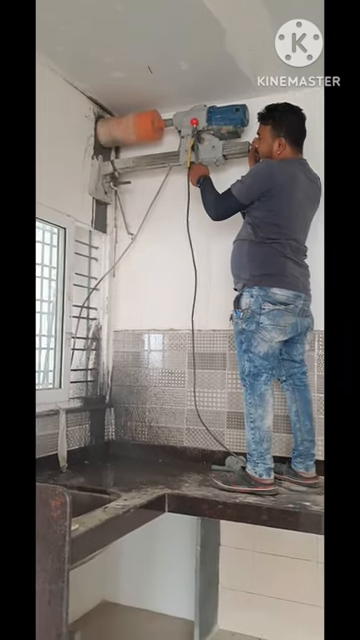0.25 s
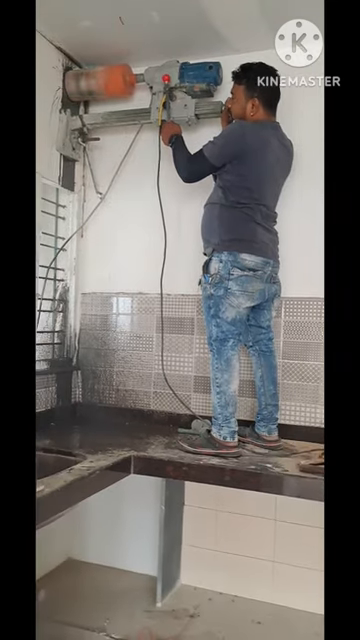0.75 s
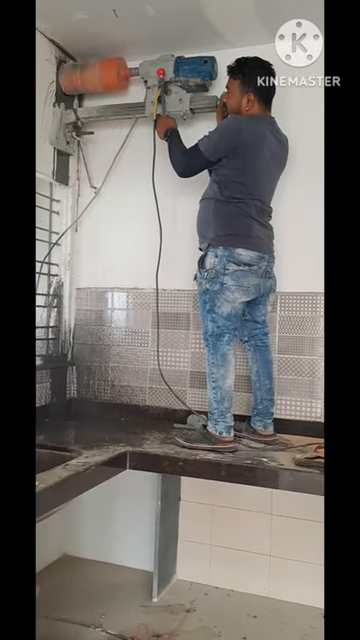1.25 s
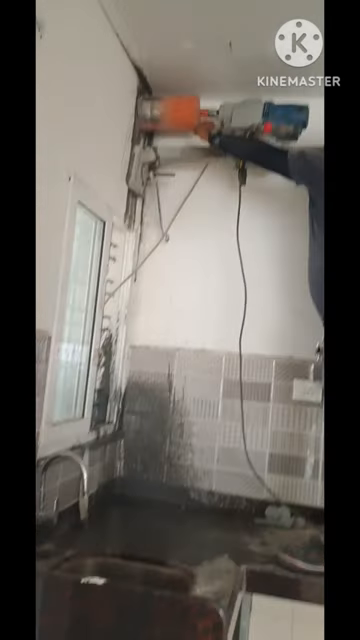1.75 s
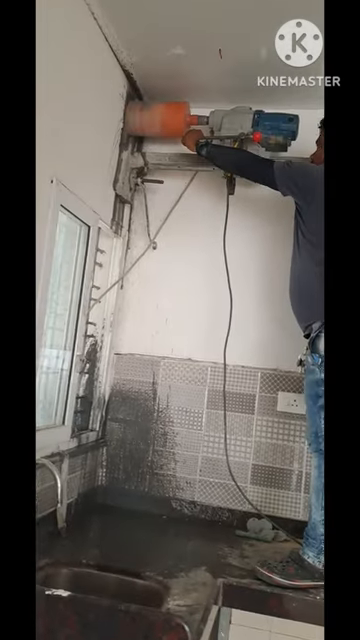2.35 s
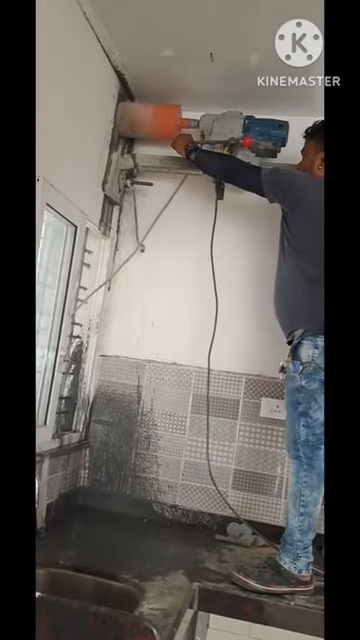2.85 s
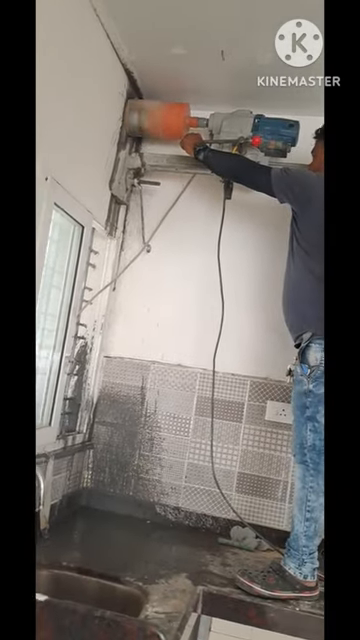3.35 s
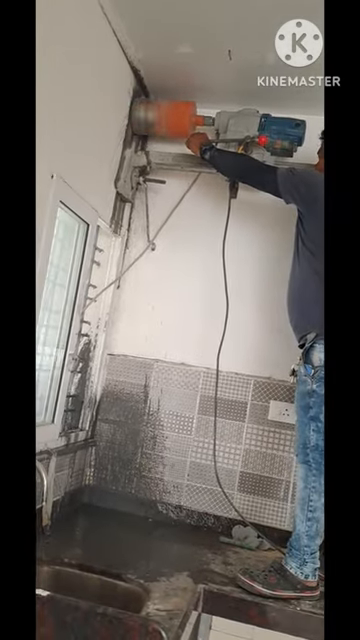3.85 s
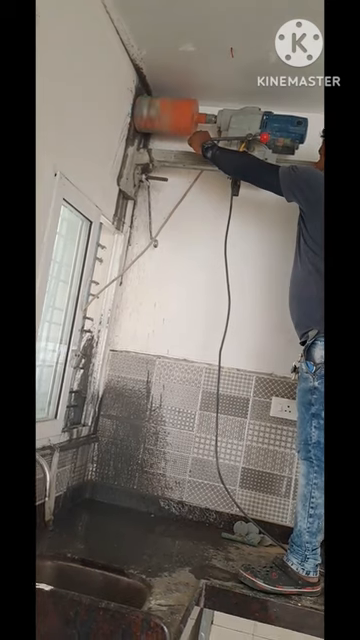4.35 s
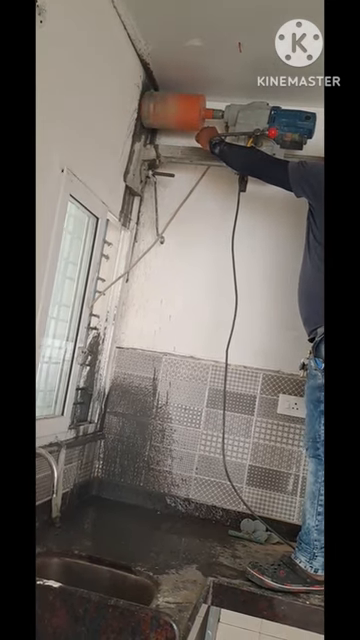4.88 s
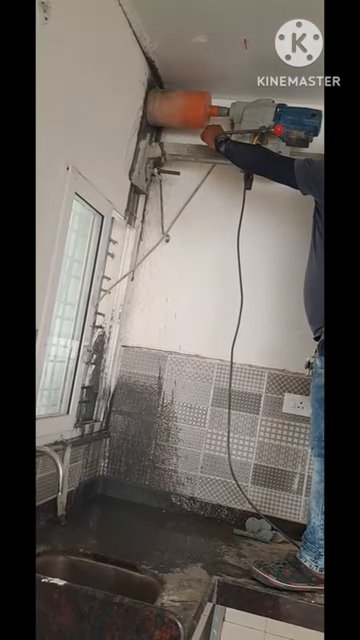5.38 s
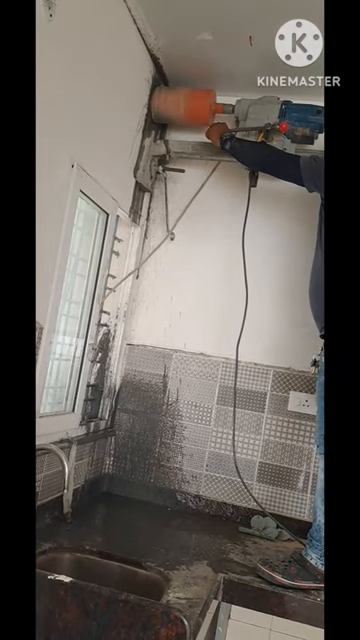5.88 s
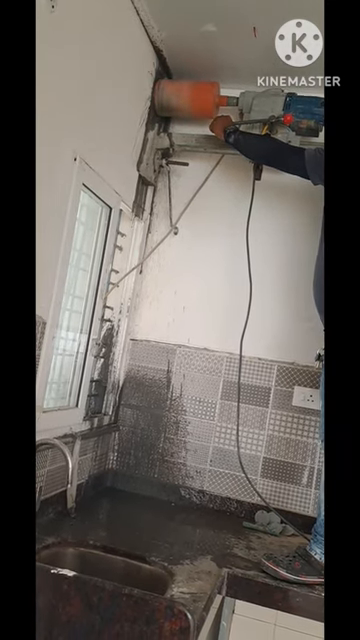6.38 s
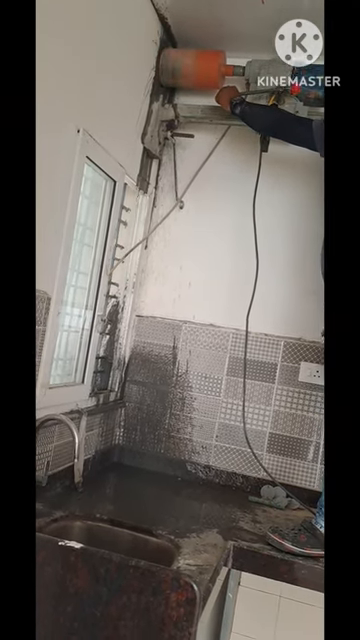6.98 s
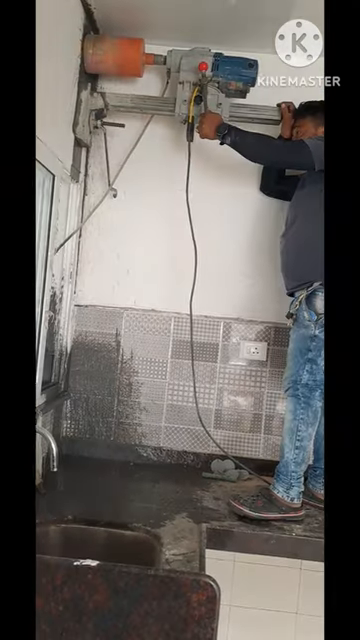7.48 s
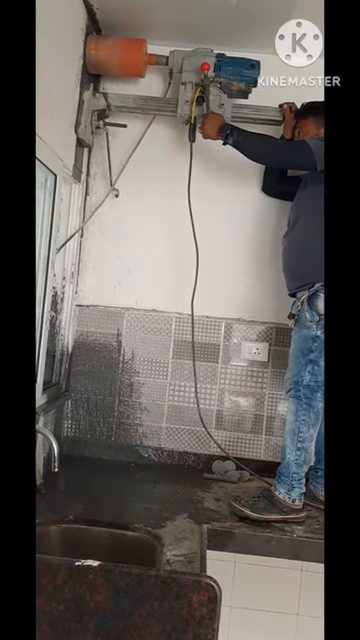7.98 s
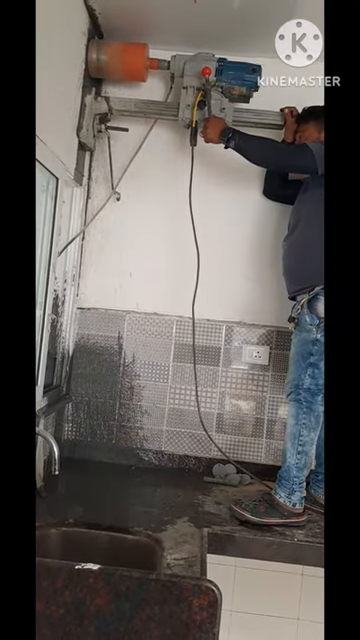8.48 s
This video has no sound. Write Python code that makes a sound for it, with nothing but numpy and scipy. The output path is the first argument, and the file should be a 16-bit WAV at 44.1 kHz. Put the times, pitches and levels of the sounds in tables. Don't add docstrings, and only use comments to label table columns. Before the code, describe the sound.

An electric core drill grinds steadily into a concrete wall in a hard, bare kitchen, its whining motor dipping briefly at two camera changes.

```python
import sys
import numpy as np
from scipy import signal
from scipy.fft import rfft, irfft, next_fast_len
from scipy.io import wavfile
from scipy.ndimage import uniform_filter1d, map_coordinates

SR = 44100
rng = np.random.default_rng(int(sys.argv[2]) if len(sys.argv) > 2 else 0)


def file_out(sig):
    cols = np.atleast_2d(sig).T
    lim = np.clip(cols, -1, 1)
    pcm = np.round(lim * 32767).astype(np.int16)
    wavfile.write(sys.argv[1], SR, pcm)


def how_loud(loudness_db):
    steps = np.asarray(loudness_db, float) / 20
    return 10 ** steps


N = 384993

# t/s, speed/(turns/s)
ROTOR_SPEED = [
    [(0, 352.2), (.8, 349.6), (1.5, 346.4)],
    [(1.54, 371), (1.9, 374.6), (2.03, 374.4), (2.34, 359.3), (2.74, 349.6), (3.14, 342.7), (3.44, 340.1),
     (4.0, 337.4), (5.04, 340), (5.74, 338.6), (6.2, 336.9), (7.34, 338.2)],
    [(7.6, 319), (8, 316), (8.73, 315)],
]
LOADED_HZ = 338


def motor(place, t):
    orders = [
        (1, 0, 0, .8, 0),
        (2, 0, -16, 3, .3),
        (4, 3, -11, 2, .5),
        (12, 1, -.7, -7, .5),
        (24, 2, -7, 4, 1.5),
        (16, 2, -.6, -4, -.5),
        (8, 3, .3, -3, -.5),
    ]
    speed_hz, = curves(ROTOR_SPEED[place], t)
    levels_db = whines(place, t, speed_hz)
    turns_rad = 2 * np.pi * np.cumsum(speed_hz + 0.095 * wobble(t, 25)) / SR
    sides = np.array([[.5], [-.5]])
    out = np.zeros((2, len(t)))
    for multiple, column, over_db, lean_db, lead_rad in orders:
        high = multiple > 1.5
        port_flutter_db = 0.7 * high * np.array([wobble(t, 9), wobble(t, 9)])
        flutter_db = 1.85 * wobble(t, 26) + port_flutter_db
        side_db = sides * (lean_db + (.9 + 1.2 * high) * wobble(t, 2))
        level_db = levels_db[column] + over_db + 3 + side_db
        side_rad = sides * (lead_rad + 0.69 * high * wobble(t, 2.46))
        out += how_loud(level_db + flutter_db) * np.sin(multiple * turns_rad + side_rad)
    return out, turns_rad


def whines(place, t, speed_hz):
    # unbalance hum/dB, slot whine/dB, fan whine/dB, pinion whine/dB
    usual_db = [(-31.5, -32, -34, -41), (-31.5, -28.5, -34, -36), (-33, -33.5, -42, -40)]
    # middle/s, length/s, level/dB
    crest_rows = [
        [(.04, .2, -9), (1.75, .5, -4.5), (2.25, .2, -3.5), (2.42, 0.13, 3), (2.95, 0.66, -7.5)],
        [(.25, .6, -7), (1.8, 0.49, 5.5), (1.9, .2, 3), (2.06, 0.14, 0), (2.67, 0.11, -9.5), (2.96, 0.34, -10),
         (3.33, 0.11, 2), (3.75, 0.12, 4.5), (4.1, 0.23, 2), (4.65, 0.18, 4.5), (4.79, .12, -8), (5.63, .52, 9),
         (6.15, 0.28, -3), (6.75, 0.58, -1.5), (7.37, .74, 5), (7.76, .08, 5), (8.18, 0.41, 6.5)],
        [(3.98, .45, 2), (4.4, .25, -2), (5.6, 0.65, -4)],
        [(2.5, 0.51, 6.5), (3.04, .2, -10), (6.45, .25, -9), (8.12, 0.42, 14), (4.65, 0.32, -5),
         (5.12, .25, 3.5)],
    ]
    wander_db = (.5, .8, 1.8, 2.2)
    fan_db_per_hz = 0.8
    pinion_yield = 1.4
    crest_db = [sum(db * np.exp(-(2 * (t - s) / length_s) ** 4) for s, length_s, db in rows)
                for rows in crest_rows]
    free_hz = np.maximum(speed_hz - LOADED_HZ, 0)
    law_db = [0, 0, -fan_db_per_hz * free_hz, -pinion_yield * np.maximum(crest_db[1], 0)]
    return [usual_db[place][k] + crest_db[k] + law_db[k] + wander_db[k] * wobble(t, 5) for k in range(4)]


def crown(place, t, turns_rad, ripples):
    # t/s, grinding level/dB
    effort = [(0, -19), (1.5, -18.5), (1.6, -20.5), (2.0, -19.5), (2.6, -19.5), (3.2, -21), (3.95, -20),
              (4.4, -20.5), (4.9, -20.5), (5.5, -19.5), (5.9, -20.5), (6.6, -20.5), (7.05, -19.5),
              (7.4, -20), (7.85, -19), (8.0, -19), (8.35, -19.5), (8.73, -19.5)]
    # grit hiss/dB, wall and rig drone/dB
    noise_mix = [(0.7, -8), (-4.5, -10), (-3.5, -10.5)]
    gearing = 32.5
    grind_db, = curves(effort, t)
    free_hz = np.maximum(curves(ROTOR_SPEED[place], t)[0] - LOADED_HZ, 0)
    hiss_db = noise_mix[place][0] - 0.0476 * free_hz
    drone_db = noise_mix[place][1] + 0.0231 * free_hz
    bite = 0.68 * wobble(t, 4.09) + 0.23 * wobble(t, 9) + 0.52 * wobble(t, 40)
    throb = np.sin(turns_rad / gearing + 0.91 * wobble(t, 1.52))
    grit = 0.51 * wobble(t, 900)

    def grind_band(hz):
        return above(hz, 1100) * np.sqrt(1 - above(hz, 6320) ** 2)

    def hiss_band(hz):
        return above(hz, 5860)

    def drone_band(hz):
        return np.sqrt(1 - above(hz, 1140) ** 2)

    grind = at_ports(patchy(t, depth_db=0.6), place, grind_band, ripples)
    hiss = at_ports(patchy(t, depth_db=0.4), place, hiss_band, ripples)
    drone = at_ports(patchy(t, depth_db=0.02), place, drone_band, ripples)
    grind_gain = how_loud(grind_db - 0.65 + bite + 0.15 * throb + 0.33 * np.sin(turns_rad) + 0.89 * grit)
    hiss_gain = how_loud(grind_db + hiss_db + 0.38 + 1.4 * bite + 0.42 * throb + grit)
    drone_gain = how_loud(grind_db + drone_db - 0.2 + 0.68 * bite)
    return grind_gain * grind + hiss_gain * hiss + drone_gain * drone


def patchy(t, depth_db):
    z = signal.stft(rng.standard_normal((3, len(t))), nperseg=512)[2]
    field = uniform_filter1d(rng.standard_normal(z.shape[1:]), size=5, axis=0)
    field = uniform_filter1d(field, size=10, axis=1)
    return signal.istft(z * how_loud(depth_db * unit(field)), nperseg=512)[1][:, :len(t)]


def at_ports(noise, place, band, ripples):
    # f/Hz, density/(dB per Hz)
    colour = [
        [(30, -29), (75, -25), (110, -21.5), (200, -17), (420, 0), (800, -9.5), (1150, -7.5), (1700, -4.0),
         (2600, -5), (3600, -4.0), (9500, -8), (12000, -3.5), (14500, -8), (15400, -8.5)],
        [(30, -31.5), (75, -24), (110, -18.5), (200, -10), (420, -2.5), (800, -8), (1150, -4.5), (1700, -2.5),
         (2600, 0.5), (3600, -3), (7500, -7.0), (12000, -7.5), (14500, -11), (15400, -13)],
        [(30, -28.5), (75, -25.5), (110, -25), (200, -12), (420, -0.5), (800, -7.5), (1150, -3.5), (1700, -5.0),
         (2600, -0.5), (3600, -2), (7500, -3.5), (12000, -5.5), (14500, -7.5), (15400, -12)],
    ]
    # f/Hz, left minus right/dB
    balance = [
        [(60, 0.0), (110, 0.0), (200, 1), (380, -4), (700, -2.5), (1290, -3), (2380, -3.5), (4400, -1.5),
         (8120, 4), (15000, -4.5)],
        [(60, -0.5), (110, 0.5), (200, -0.5), (380, -4.5), (700, 2.5), (1290, -1), (2380, -5.5), (4400, -6),
         (8120, 2.5), (15000, 0.5)],
        [(60, 0.5), (110, 0.5), (200, 1), (380, -2.5), (700, 1), (1290, -1.0), (2380, -4.5), (4400, -4.5),
         (8120, 3), (15000, 3)],
    ]
    lead_s = [0.000532, 0.000282, 0.000264]
    # f/Hz, width/Hz, level # over the drone/dB
    peaks = [
        [(124, 13, 7.5), (144, 9.2, 7.5), (283, 40, 11), (456, 25.3, 6), (536, 20, 6.5), (12120, 50, 0)],
        [(51, 9, 15), (142.1, 7.6, 5), (530, 13, 5.5), (599, 13.6, 1), (1112, 35, 4), (1340, 73, 3.5)],
        [(50, 9, 10), (143, 13, 3), (613, 18, 4)],
    ]
    # f/Hz, share common to both
    common = [(30, .75), (70, 1), (100, 0.84), (140, 0.94), (300, 0.86), (450, 0.61), (750, 0.17),
              (1500, 0.2), (4000, 0.21), (8000, 0.12), (12000, 0.14)]

    def response(hz):
        share = np.clip(along(common, hz), 0, 1)
        modes = 1 + sum((how_loud(db) - 1) / (1 + (2 * (hz - centre_hz) / width_hz) ** 2)
                        for centre_hz, width_hz, db in peaks[place])
        gain = how_loud(along(colour[place], hz)) * modes * band(hz)
        gain = gain / np.sqrt(1 + share * (hz < 600))
        ripple = np.interp(hz, np.arange(len(ripples[place])) * 14, ripples[place])
        gain = gain * how_loud(1.78 * ripple)
        lead_rad = np.pi * lead_s[place] * np.maximum(hz - 400, 0)
        half = how_loud(along(balance[place], hz) / 2) * np.exp(1j * lead_rad)
        direct = gain * np.sqrt(share)
        diffuse = gain * np.sqrt(1 - share)
        return [direct * half, diffuse * half, direct / half, diffuse / half]

    parts = filtered(noise[[0, 1, 0, 2]], response)
    pair = parts[::2] + parts[1::2]
    return pair / np.std(pair.mean(0))


def handling():
    # t/s, level/dB, f/Hz, length/s
    bumps = [
        (2.72, -37, 88, .07),
        (2.85, -39, 60, .06),
    ]
    t = np.arange(N) / SR
    out = np.zeros(N)
    for s, db, hz, length_s in bumps:
        swell = np.exp(-.5 * ((t - s) / (length_s / 3)) ** 2)
        out += how_loud(db) * swell * np.sin(2 * np.pi * hz * (t - s))
    return out


def fader(place, t):
    # fade-in start/s, length/s, fade-out end/s, length/s, lowest level/dB
    fades = [
        (-1, .1, 1.5135, .022, -46),
        (1.55, .19, 7.8, .16, -26),
        (7.61, .19, 9.8, .1, -40),
    ]
    start_s, rise_s, end_s, fall_s, rest_db = fades[place]
    return np.clip(np.minimum((t - start_s) / rise_s, (end_s - t) / fall_s), how_loud(rest_db), 1)


def unit(x):
    return x / np.sqrt(np.mean(x ** 2) + 1e-20)


def along(points, hz):
    f, v = np.transpose(points)
    return np.interp(np.log(hz + 1), np.log(f + 1), v)


def curves(rows, t):
    s, *columns = np.transpose(rows)
    return [np.interp(t, s, column) for column in columns]


def wobble(t, rate_hz):
    knots = rng.standard_normal(int(N * rate_hz / SR) + 4)
    return map_coordinates(knots, [t * rate_hz], order=2)


def filtered(x, response):
    m = next_fast_len(x.shape[-1] + 8192)
    return irfft(rfft(x, m) * response(np.fft.rfftfreq(m, 1 / SR)), m)[..., :x.shape[-1]]


def above(hz, edge_hz):
    return np.sqrt(1 / (1 + (edge_hz / (hz + 1)) ** 8))


def scene():
    # from/s, to/s
    shots = [
        (0, 1.5335),
        (1.5335, 7.87),
        (7.54, 8.74),
    ]
    out = np.zeros((2, N)) + handling() * how_loud([[3], [-7]])
    ripples = rng.standard_normal((3, 1600))
    for place, (first_s, last_s) in enumerate(shots):
        span = slice(int(first_s * SR), min(int(last_s * SR), N))
        t = np.arange(N)[span] / SR
        whine, turns_rad = motor(place, t)
        out[:, span] += fader(place, t) * (whine + crown(place, t, turns_rad, ripples))
    return out


def top_cut(x):
    return signal.sosfilt(signal.butter(12, 15550, fs=SR, output="sos"), x)


def record(dry):
    x = filtered(dry, lambda hz: 1 / (1 + (hz / 15350) ** 120))
    x = x / (1 + np.abs(x / 1.05) ** 8) ** (1 / 8)
    return top_cut(x)


dry = scene()
out = record(dry)
file_out(out)
```